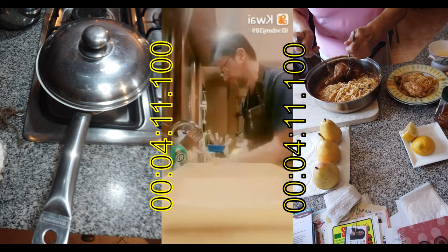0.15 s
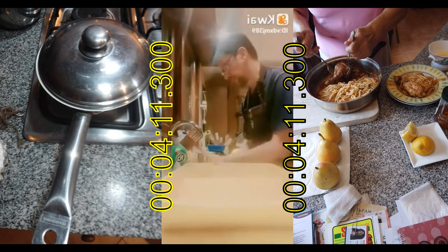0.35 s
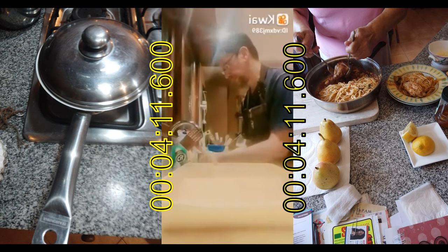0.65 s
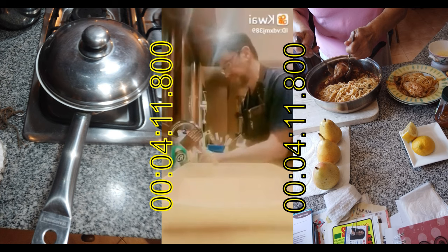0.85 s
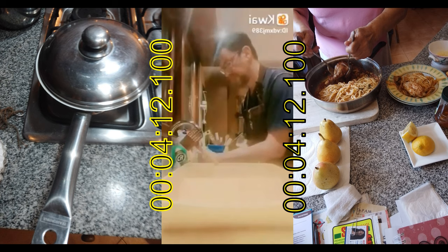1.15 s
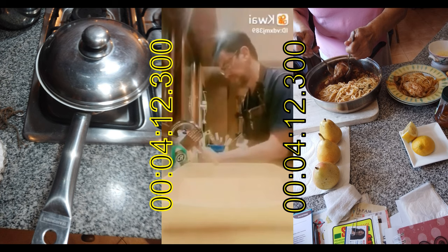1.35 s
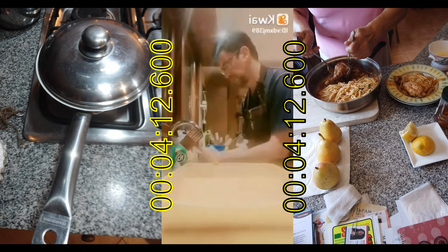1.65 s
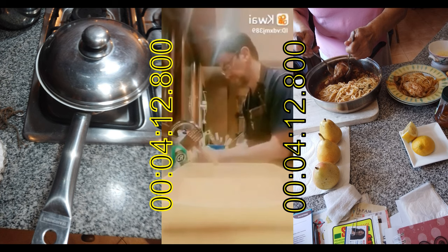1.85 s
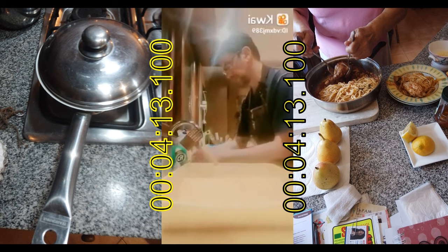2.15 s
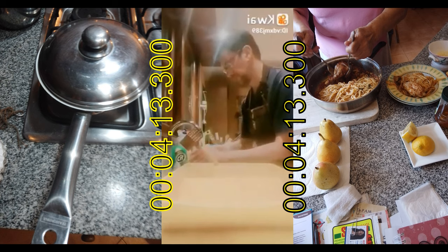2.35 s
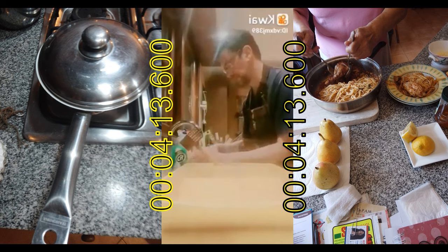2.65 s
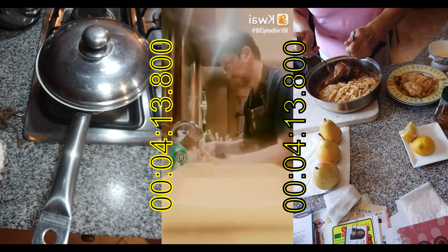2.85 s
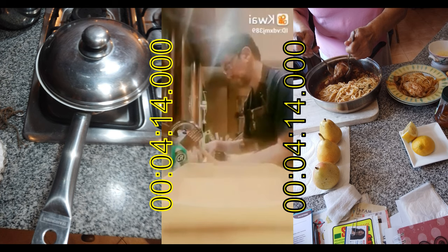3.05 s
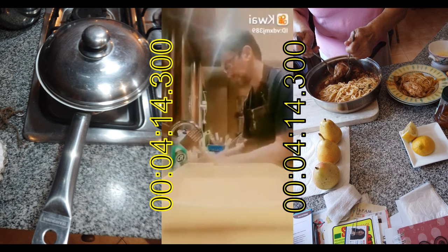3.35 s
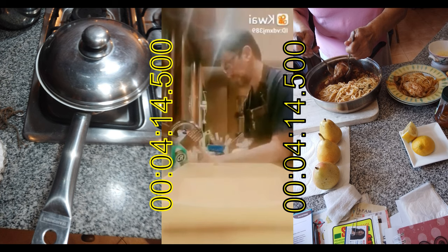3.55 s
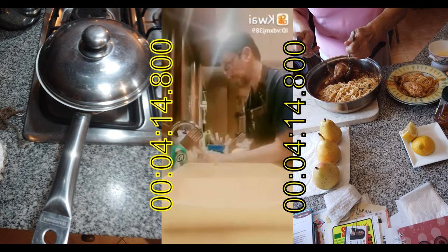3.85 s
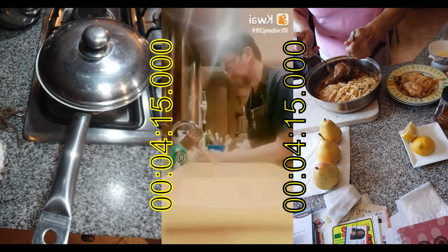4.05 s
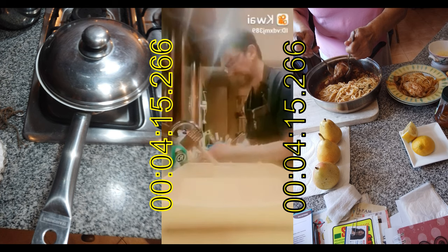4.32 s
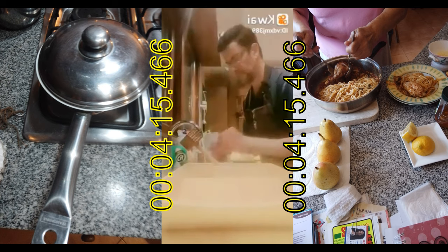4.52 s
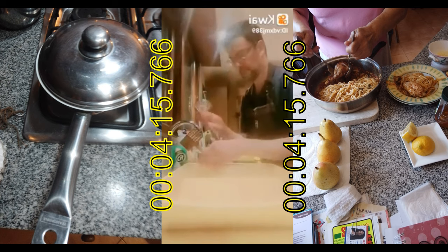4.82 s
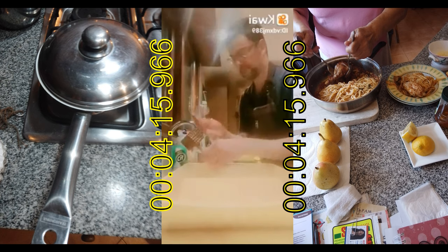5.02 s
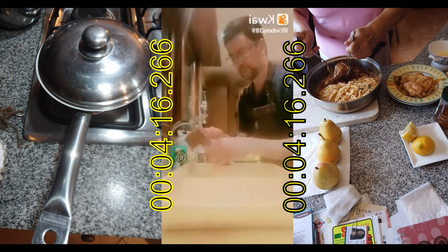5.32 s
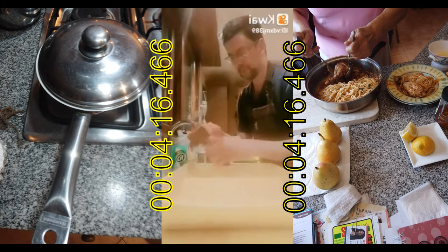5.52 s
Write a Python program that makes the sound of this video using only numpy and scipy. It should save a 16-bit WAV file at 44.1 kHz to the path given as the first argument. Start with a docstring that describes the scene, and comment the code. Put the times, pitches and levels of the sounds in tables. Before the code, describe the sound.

Quiet room tone and suds give way to dishwashing in a basin: damped bowl knocks, bright glass and cutlery ticks, dull pot knocks, scraping dishes and sloshing water. The densest clatter falls around the middle. Then it calms, and a double-hit bang and a second deep thump burst out with short kitchen reverberation, captured from a few metres by a small, slightly dull microphone.

```python
"""Room tone and a faint fizz of suds come first, then dishes are washed by hand in a kitchen,
a few metres from a small microphone. Damped and rubbed modes make the bowl, short rings and noise ticks
the cutlery and glasses, filtered noise and bubbles the water; scraping dishes and shaken crockery are noise
in narrow bands. Something heavy is dragged briefly, and near the end two dull bangs ring through the room."""
import sys
import numpy as np
from scipy import signal
from scipy.fft import rfft, irfft
from scipy.io import wavfile
from scipy.ndimage import uniform_filter1d

SR = 44100
rng = np.random.default_rng(int(sys.argv[2]) if len(sys.argv) > 2 else 0)


def file_out(sig):
    """Save sig as 16-bit WAV at sys.argv[1]."""
    # one column per channel
    cols = np.atleast_2d(sig).T
    # limit, then scale
    lim = np.clip(cols, -1, 1)
    pcm = np.round(lim * 32767).astype(np.int16)
    wavfile.write(sys.argv[1], SR, pcm)


N = 250488  # samples

# clinks of cutlery and glass: t/s, peak level/dB, f/Hz, hard tick against the ring level/dB, ring t60/s
CLINKS = [(.168, -45, 2880, 6, .15), (.2023, -41, 3710, -3, 0.13), (0.2837, -44.5, 3760, -14, 0.13),
          (0.301, -44, 4470, -10, 0.053), (0.3572, -46, 2520, -7, 0.024), (0.405, -39.5, 7250, -5, 0.046),
          (0.5878, -41.5, 1740, -18, 0.044), (.649, -39.5, 8360, -13, .06), (0.765, -42.5, 8770, 7.5, 0.23),
          (0.7957, -42.5, 2906, -2, 0.049), (.8586, -47.5, 5330, -12, .08), (1.0136, -40.5, 3210, 3, 0.16),
          (1.134, -31.5, 3260, 16, 0.21), (1.422, -46, 2500, 3, 0.045), (1.5445, -34, 4780, 12, 0.081),
          (1.589, -35.5, 5050, 10, 0.036), (1.791, -41.5, 2940, -16, 0.04), (1.835, -32, 6950, -15, 0.045),
          (1.8763, -34.5, 7360, -20, .065), (1.9474, -32.5, 5720, -11, 0.08),
          (2.011, -37.5, 3060, -17, .08), (2.074, -32, 1800, 18, 0.046), (2.217, -39.5, 8740, -16, 0.04),
          (2.2864, -43, 8360, -1, 0.27), (2.31, -26.5, 3046, 20.5, 0.04), (2.3506, -33, 7700, 13, .07),
          (2.373, -34.5, 4150, 12.5, 0.057), (2.4324, -42, 2680, 13, 0.063), (2.711, -32, 2708, 15, 0.16),
          (2.7413, -30.5, 2030, -21, .04), (2.943, -43, 5800, -1, 0.064), (3.0095, -34.5, 3050, 3, 0.053),
          (3.0577, -32.5, 4500, 5, 0.087), (3.2136, -42, 5000, -1, 0.032), (3.2843, -27, 4583, 14, 0.065),
          (3.3098, -24.5, 2660, 18, .12), (3.3563, -36.5, 2570, -3, 0.088),
          (3.4187, -36.5, 7470, -15, 0.13), (3.5399, -47, 2900, -13, .1), (3.774, -41, 2565, -22, 0.038),
          (3.94, -37, 3040, 15, 0.036), (4.0449, -33.5, 1650, -23, 0.13), (4.1146, -38.5, 1830, 9, 0.077),
          (4.2084, -29.5, 2416, 20, 0.082), (4.307, -44.5, 9400, -11, .22), (4.3777, -38, 4050, 9, 0.12),
          (4.424, -39.5, 7000, -12, 0.047), (4.4825, -32.5, 3050, -11, 0.039), (4.5351, -30, 2750, 6, 0.11),
          (4.565, -25, 2830, -5, 0.049), (4.737, -36, 3030, 7, .05), (4.7823, -36, 3100, -15, .09),
          (4.87, -42.5, 5600, -18, 0.089), (5.048, -41, 3100, -15, .05), (5.4976, -47, 2270, -22, 0.034),
          (5.5526, -47.5, 2800, -25, 0.02)]


def gain_of(db):
    """Decibels to amplitude."""
    return 10 ** (np.asarray(db) / 20)


def evened(x):
    """Scales to an rms of one."""
    return x / np.sqrt(np.mean(x ** 2) + 1e-20)


def peaked(x):
    """Scales to a peak of one."""
    return x / (abs(x).max() + 1e-20)


def smoothed_noise(frames, size):
    """A slow random drift of rms one: noise under a running mean."""
    return evened(uniform_filter1d(rng.standard_normal(frames), size=size))


def read(points, hz):
    """Reads a spectrum on a log-frequency axis."""
    f, value = np.transpose(points)
    return np.interp(np.log(hz + 1), np.log(f + 1), value)


def curves(rows):
    """Joins timed rows into one value per sample for each column."""
    s, *values = np.transpose(rows)
    return [np.interp(np.arange(N) / SR, s, v) for v in values]


def add(mix, s, sound):
    """Lays a sound into the mix at second s."""
    part = mix[round(s * SR):][:len(sound)]
    part += sound[:len(part)]


def resonate(x, hz, width):
    """A one-pole resonance of gain about one at hz, width in Hz."""
    r = np.exp(-np.pi * width / SR)
    pole = r * np.exp(2j * np.pi * hz / SR)
    return 2 * signal.lfilter([1 - r], [1, -pole], x + 0j).real


def resonate_twice(x, hz, width):
    """Two equal resonances in a row, for steeper skirts."""
    return resonate(resonate(x, hz, width), hz, width)


def colour(x, points):
    """Filters by a spectrum given in dB."""
    hz = np.fft.rfftfreq(len(x), 1 / SR)
    return irfft(rfft(x) * gain_of(read(points, hz)), len(x))


def hiss(points, patchy_db, flicker_db, size=512):
    """Random short-time spectra with drifting patches and a flicker shared by all bands."""
    frames, hz = 4 * N // size + 5, np.fft.rfftfreq(size, 1 / SR)
    a, b, patches = rng.standard_normal((frames, len(hz), 3)).T
    # axis 0 is frequency, axis 1 is time
    patches = uniform_filter1d(patches, size=7, axis=0)
    patches = evened(uniform_filter1d(patches, size=12, axis=1))
    flicker = smoothed_noise(frames, 5)
    level_db = read(points, hz)[:, None]
    z = (a + 1j * b) * gain_of(level_db + patchy_db * patches + flicker_db * flicker)
    return evened(signal.istft(z, nperseg=size, noverlap=3 * size // 4)[1][:N])


def drops(points, per_s, spread_db, cycles, count=24):
    """Short bubbles of many pitches, each rising slightly and each pitch with its own sparse train."""
    out = np.zeros(N)
    for hz in np.geomspace(points[1][0], points[-2][0], count):
        turns = np.arange(1500) * hz / SR
        rising = np.sin(2 * np.pi * turns * (1 + .001 * turns))
        bubble = rising * np.exp(-turns / cycles) * np.minimum(turns / 2, 1)
        train = 1. * (rng.random(N) < per_s / count / SR)
        sizes = gain_of(spread_db * np.minimum(rng.exponential(1, 400), 4))
        train[train > 0] = sizes[:int(train.sum())]
        out += gain_of(read(points, hz)) * signal.oaconvolve(train, bubble / np.linalg.norm(bubble))[:N]
    return evened(out)


def room_tone():
    """The steady air of the room: noise with a fixed spectrum and a slight flicker."""
    # spectrum of the room tone: f/Hz, relative level/dB
    air_spectrum = [(15, -50), (25, 9.5), (74, -1), (214, 12), (337, 1), (738, -1.5), (950, -8),
                    (1350, -2.5), (1570, -40), (2890, -40), (4010, -10.5), (9230, -13.5), (10500, -74),
                    (13600, -54), (22000, -120)]
    return gain_of(-65) * hiss(air_spectrum, patchy_db=0.5, flicker_db=1.5, size=2048)


def kitchen(x):
    """Reverberation as sparse taps of random sign, each band dying at its own speed."""
    # decay of the kitchen: f/Hz, t60/s
    decay_times = [(100, 0.62), (260, 0.48), (700, 0.57), (1840, 0.29), (4850, 0.28)]
    taps = np.zeros(SR)
    at = np.arange(260, SR - 20, 20) + rng.integers(0, 20, (SR - 261) // 20)
    taps[at] = rng.choice([-1., 1.], at.shape)
    hz, t, z = signal.stft(taps, SR, nperseg=256)
    t60 = read(decay_times, hz)[:, None]
    tail = signal.istft(z * gain_of(-60 * t / t60), SR, nperseg=256)[1]
    return signal.fftconvolve(x, tail / np.linalg.norm(tail))[:N]


def bangs():
    """Each blow sets board modes ringing, the high ones shorter and all roughened by rattle, under a crack."""
    # blows: t/s, body level/dB, crack level/dB against the body, rise/ms, ring t60/s at 600 Hz
    blows = [(5.060, -14, -2.5, 4.1, 0.12), (5.070, -4, -9, 4, 0.051), (5.640, -1, -17, 5.1, 0.072)]
    # modes of the boards: f/Hz, level/dB on the cupboard, level/dB on the counter
    board = [(124, -14, -41), (222.7, -6, -10.5), (279.7, -13, -1.5), (462.6, -6, 6), (585, -6.5, 14),
             (740, -6, -40), (892.6, -0.5, 16), (993, -11, 4.5), (1070, -28, -37), (1422, -1, -46),
             (1690, -35, -28), (1890, 0.5, -26), (2100, -8, -2), (2340, -15, 0), (2770, -6, -36)]
    # spectrum of the crack: f/Hz, level/dB
    crack_spectrum = [(300, -12), (1200, -2), (3000, -15), (6000, -26), (10000, -37)]
    # response of the small microphone to these bangs: f/Hz, level/dB
    microphone = [(20, -16), (60, -12), (120, 8.5), (10000, -3.5)]
    out, t = np.zeros(N), np.arange(16000) / SR
    # two blows on the cupboard close together, then one on the counter
    for (s, db, crack_db, ms, t60), column in zip(blows, (1, 1, 2)):
        rise = np.sin(np.pi / 2 * np.minimum(t / (max(ms, 1) / 1000), 1)) ** 2
        body = 0
        for row in board:
            hz = row[0]
            tone = np.sin(2 * np.pi * hz * t)
            rattle = evened(resonate(rng.standard_normal(len(t)), hz, 0.12 * hz))
            decay_db = -60 * t / t60 * (hz / 600) ** 0.47
            body = body + gain_of(row[column] + decay_db) * (tone + .35 * rattle)
        crack_decay = gain_of(-60 * t / 0.055) + 0.22 * gain_of(-60 * t / 0.4)
        crack = colour(rng.standard_normal(len(t)), crack_spectrum) * crack_decay
        add(out, s, gain_of(db) * rise * (peaked(body) + gain_of(crack_db) * peaked(crack)))
    return colour(out, microphone)


def basin():
    """Amplitudes of splash, fizz and slosh; every clink stirs a dying burst into the first two."""
    # suds and water before the bursts: t/s, splash level/dB, fizz level/dB, slosh level/dB
    water_levels = [(0.0, -75.5, -69.5, -80), (0.14, -62, -62, -67.5), (0.33, -61, -60, -68.5),
                    (0.76, -66, -65, -74.5), (1.03, -62, -55.5, -61), (1.2, -66, -67, -56),
                    (1.44, -61, -60.5, -71), (1.69, -59.5, -59, -73), (2.01, -57, -72, -54.5),
                    (2.15, -57.5, -61, -72), (2.4, -94, -63.5, -73.5), (2.67, -56.5, -59.5, -66.5),
                    (2.88, -63.5, -62.5, -64), (3.29, -61.5, -57, -63), (3.43, -62.5, -67, -56),
                    (3.61, -66, -62.5, -74.5), (3.84, -64.5, -61.5, -73), (3.99, -57.5, -55, -59),
                    (4.11, -58.5, -68, -57.5), (4.26, -69.5, -59, -75.5), (4.48, -55.5, -65, -62),
                    (4.65, -56, -65, -54.5), (4.82, -72, -60, -64.5), (5.01, -62, -72.5, -60.5),
                    (5.24, -65.5, -71, -67.5), (5.68, -66, -74, -63)]
    stir_db, stir_fizz_db, stir_t60_s = -27, -23, 0.38  # splash and fizz burst against the clink's peak
    stir, t = np.zeros(N), np.arange(20000) / SR
    for s, db, *_ in CLINKS:
        add(stir, s, gain_of(2 * (db - 60 * t / stir_t60_s)))  # doubled dB: bursts add as power
    splash, fizz, slosh = gain_of(curves(water_levels))
    splash = np.sqrt(splash ** 2 + gain_of(2 * stir_db) * stir)
    fizz = np.sqrt(fizz ** 2 + gain_of(2 * stir_fizz_db) * stir)
    return np.array([splash, fizz, slosh])


def water():
    """Three sizes of bubbles over their own wash follow the hands in the basin."""
    # spectra of the three layers: f/Hz, level/dB
    splash_spectrum = [(1200, -26.5), (2000, 3), (3000, 9), (4500, 1.5), (6500, -24)]
    fizz_spectrum = [(3500, -4), (5500, 13), (7500, 13.5), (9500, 11.5), (9900, -29.5), (10600, -64)]
    slosh_spectrum = [(250, -13), (500, 0.5), (1000, 1), (1800, 5.5), (2600, -44)]
    splash = hiss(splash_spectrum, patchy_db=3.5, flicker_db=2.5)
    splash += .6 * drops(splash_spectrum, per_s=200, spread_db=3., cycles=8.)
    fizz = hiss(fizz_spectrum, patchy_db=1.0, flicker_db=3.84)
    fizz += .15 * drops(fizz_spectrum, per_s=300, spread_db=2.5, cycles=10.)
    slosh = hiss(slosh_spectrum, patchy_db=4.0, flicker_db=1.1)
    slosh += .6 * drops(slosh_spectrum, per_s=80, spread_db=3.5, cycles=6.)
    return (basin() * [evened(splash), evened(fizz), evened(slosh)]).sum(0)


def drag():
    """One swelling pull: uneven slips shake a low resonance and a weaker one above it."""
    start_s, end_s, level_db, low_hz, sharpness = 3.0, 3.27, -50, 212, 1.05
    slips = (rng.random(N) < 300 / SR) * rng.choice([-1., 1.], N)  # about 300 a second
    slips = slips + 0.043 * rng.standard_normal(N)
    done = np.clip((np.arange(N) / SR - start_s) / (end_s - start_s), 0, 1)
    low = evened(resonate(resonate(slips, low_hz, 68), low_hz, 110))
    upper = evened(resonate_twice(slips, 600, 250))
    pull = gain_of(level_db) * abs(np.sin(np.pi * done)) ** sharpness
    return pull * (low + 0.26 * upper)


def struck(hz, t60, spread, gritty):
    """One mode at the pitch, and a gritty burst in a band around it like many damped neighbours."""
    t = np.arange(6000) / SR
    grit = resonate_twice(rng.standard_normal(len(t)), hz, spread * hz)
    tone = np.sin(2 * np.pi * (hz * t + rng.random()))
    envelope = gain_of(-60 * t / max(t60, .01)) * np.minimum(t / 0.0021, 1)
    return peaked((tone + gritty * evened(grit)) * envelope)


def pots():
    """Dull knocks of pots in the basin: a low mode and a wide gritty band dying together."""
    # knocks: t/s, peak level/dB, f/Hz, ring t60/s
    pot_knocks = [(.615, -41, 817, 0.063), (1.275, -45.5, 690, 0.051), (1.624, -39.5, 590, 0.055),
                  (1.651, -41.5, 506, 0.042), (1.95, -40.5, 598, 0.16), (2.078, -39, 854, 0.11),
                  (2.151, -46, 300, 0.06), (2.155, -42, 592, 0.055), (2.71, -45.5, 1130, 0.069),
                  (2.74, -37.5, 1057, 0.045), (2.742, -37, 756, 0.15), (2.933, -42, 697, 0.17),
                  (3.408, -43.5, 591, 0.11), (3.947, -45, 874, 0.083), (4.047, -40, 1060, 0.13),
                  (4.992, -38.5, 217.5, 0.9), (5.383, -48, 883, .11), (5.497, -42, 480, 0.32)]
    out = np.zeros(N)
    for s, db, hz, t60 in pot_knocks:
        add(out, s, gain_of(db) * struck(hz, t60, spread=0.83, gritty=0.56))
    return out


def crockery():
    """Modes of the stacked crockery shake in their own uneven bouts, harder as splash and fizz rise."""
    # modes: f/Hz, width/Hz before widening, level/dB before the bouts
    stack_modes = [(1916, 91, 0.5), (2080, 70, -11), (2880, 115, 4), (3720, 190, -18), (4300, 54, -27),
                   (4720, 240, -2.5), (6130, 140, -8.5), (6050, 110, -19), (6720, 83, 3), (7360, 57, 6),
                   (8650, 150, -35), (8600, 75, -18), (8530, 38, 2), (9440, 270, -0.5)]
    out = np.zeros(N)
    for hz, width, db in stack_modes:
        push, bouts = rng.standard_normal((2, N))
        bouts = evened(uniform_filter1d(uniform_filter1d(bouts, size=3000), size=1500))
        out += gain_of(db + 4 * bouts) * evened(resonate_twice(push, hz, 1.2 * width))
    splash, fizz, _ = basin()
    return gain_of(-2.5) * splash ** 0.59 * fizz ** 0.41 * evened(out)


def scrapes():
    """One dish along another: stick and slip in clumps excite the band in which the dish sings."""
    # scrapes: start t/s, end t/s, f/Hz, level/dB at the start, change of level/dB by the end
    dish_strokes = [(0.162, 0.32, 3800, -58.5, -9), (1.617, 1.729, 535, -47, -14.5),
                    (1.805, 1.95, 7020, -55, 1), (1.952, 2.19, 2780, -54, -13),
                    (2.704, 2.824, 1970, -49.5, -14), (2.731, 2.871, 1140, -42, -20),
                    (2.738, 2.857, 6770, -49, -47), (3.003, 3.135, 4270, -51, -18),
                    (3.284, 3.492, 3250, -46, -18), (3.285, 3.447, 4740, -51.5, -11),
                    (3.294, 3.494, 2280, -52.5, -15), (3.307, 3.524, 1760, -50.5, -23),
                    (3.295, 3.5, 623, -61, -13), (4.037, 4.256, 1765, -45.5, -18),
                    (4.04, 4.256, 1104, -60.5, 4.5), (4.19, 4.312, 2355, -48.5, -15.5),
                    (4.36, 4.58, 2880, -59.5, -1), (4.55, 4.734, 2770, -52.5, -12),
                    (4.556, 4.705, 1790, -47, -17), (4.496, 4.835, 541, -58.5, -1.5),
                    (5.379, 5.624, 559.4, -55.5, -4.5)]
    out = np.zeros(N)
    for start, end, hz, db, fade_db in dish_strokes:
        width = 0.073 * hz + 96  # Hz
        n = round((end - start) * SR)
        noise, clumps = rng.standard_normal((2, 20000))[:, :n]
        slips = noise * gain_of(3.5 * evened(uniform_filter1d(clumps, size=300)))
        stroke = gain_of(db + np.linspace(0, fade_db, n)) * signal.windows.tukey(n, .15)
        add(out, start, stroke * evened(resonate_twice(slips, hz, width)))
    return out


def clinks():
    """Each clink of cutlery or glass is a wide noise tick and a short ring at its own pitch."""
    out, t = np.zeros(N), np.arange(6000) / SR
    tick_envelope = gain_of(-60 * t / 0.032) * np.minimum(t / 0.0045, 1)
    for s, db, hz, tick_db, t60 in CLINKS:
        tick = np.diff(rng.standard_normal(6001)) * tick_envelope / 3  # the difference brightens it
        ring = struck(hz, t60, spread=0.32, gritty=0.88)
        add(out, s, gain_of(db) * peaked(ring + gain_of(tick_db) * tick))
    return out


def bowl():
    """Soft wet knocks, damped at once by the hand, and uneven rubbing feed the same modes."""
    # modes: f/Hz, width/Hz before the hand widens it for rubbing, level/dB before the tilts below
    bowl_modes = [(866, 46, -27), (1370.3, 34.4, 5), (2525, 60, -9), (3280, 69, -13), (3900, 40, -51),
                  (5730, 140, -23.5), (6540, 170, -35), (8670, 56, -50), (9500, 62, -16.5),
                  (8900, 140, -18)]
    # knocks, each beginning 5 ms before its time: t/s, peak level/dB
    bowl_knocks = [(0.1257, -45.5), (.3406, -53), (.4324, -58), (0.527, -50.5), (1.0095, -47), (1.068, -44),
                   (1.132, -40.5), (1.185, -38.5), (1.2146, -24.5), (1.426, -52), (1.512, -40.5),
                   (1.713, -39.5), (1.933, -38.5), (1.9673, -26), (2.0729, -27.5), (3.041, -50),
                   (3.353, -43.5), (4.0068, -41), (4.2082, -37.5), (5.2815, -43.5), (5.3854, -48.5)]
    # rubbing strokes: start t/s, end t/s, level/dB
    rubs = [(0.277, 0.626, -77), (1.014, 1.282, -53), (1.272, 1.83, -60), (1.76, 2.215, -61.5),
            (3.007, 3.12, -59), (3.28, 3.491, -46.5), (4.03, 4.266, -54), (4.46, 4.74, -62.5)]
    contact_s, dull_db_per_octave = 0.0068, -8  # a soft contact feeds the upper modes less
    rub_idle_db, rub_ramp_s = -75, 0.079

    out, t = np.zeros(N), np.arange(3000) / SR
    after = np.maximum(t - contact_s, 0)
    swell = np.sin(np.pi / 2 * np.minimum(t / contact_s, 1)) ** 2
    swell = swell * (1.5 * np.exp(-(after / (1.15 * contact_s)) ** 2) + 0.084 * np.exp(-after / 0.02))
    for s, db in bowl_knocks:
        ring = 0
        for hz, _, mode_db in bowl_modes:
            dull_db = dull_db_per_octave * max(np.log2(hz / 1400), 0)
            level = gain_of(mode_db + dull_db + 3 * rng.standard_normal())
            ring = ring + level * np.sin(2 * np.pi * (hz * t + rng.random()))
        add(out, s - .005, gain_of(db) * peaked(ring * swell))

    slips = rng.standard_normal(N) * gain_of(5.8 * smoothed_noise(N, 400))
    rubbed = 0
    for hz, width, db in bowl_modes:
        level = gain_of(db + 3.9 * np.log2(hz / 1370)) / np.sqrt(width)
        rubbed = rubbed + level * resonate_twice(slips, hz, 2.9 * width)
    t = np.arange(N) / SR
    strokes = gain_of(rub_idle_db)  # a faint rubbing never stops
    for start, end, db in rubs:
        strokes = strokes + gain_of(db) * np.clip(np.minimum(t - start, end - t) / rub_ramp_s, 0, 1)
    return out + strokes * evened(rubbed)


def scene():
    """Sources, their reverberation and the room tone."""
    held, sink, far = bowl(), clinks() + pots() + scrapes(), bangs()
    wet = kitchen(gain_of(-11.5) * held + gain_of(-7.5) * sink + gain_of(-4) * far)
    air = room_tone()
    return (held + sink + wet + water() + crockery() + drag() + far + air)[None]


def record(dry):
    """A gentle limit softens the loudest peaks, then the band limit, over a faint high hiss."""
    edge = signal.firwin(511, 10450, window=("kaiser", 9), fs=SR)  # low-pass, Hz
    faint = colour(rng.standard_normal(N), [(9000, 4), (15700, 12), (15800, 12)])
    faint = gain_of(-93) * evened(faint)
    dry = dry / (1 + abs(dry / .92) ** 6) ** (1 / 6)
    return signal.oaconvolve(dry, edge[None], "same") + faint


dry = scene()
out = record(dry)
file_out(out)
```